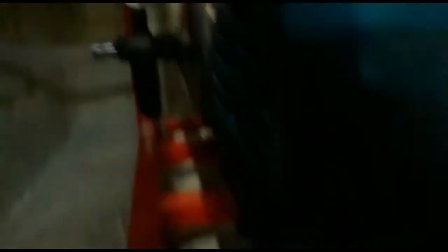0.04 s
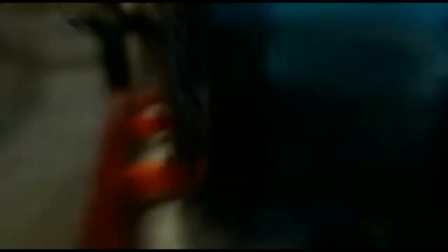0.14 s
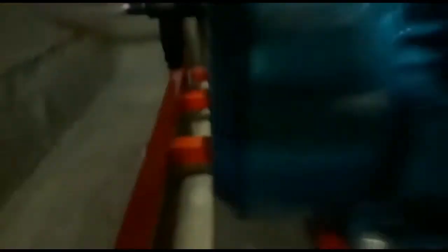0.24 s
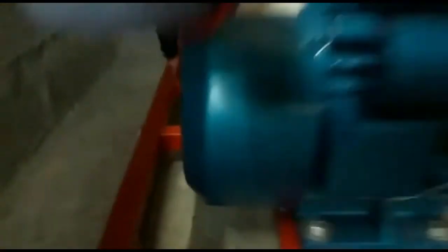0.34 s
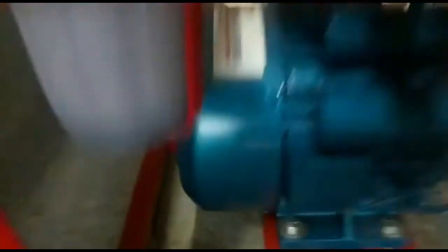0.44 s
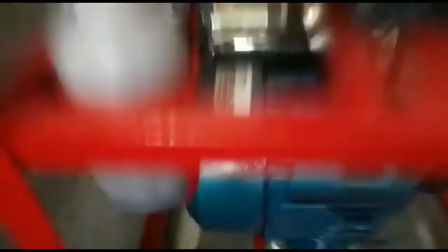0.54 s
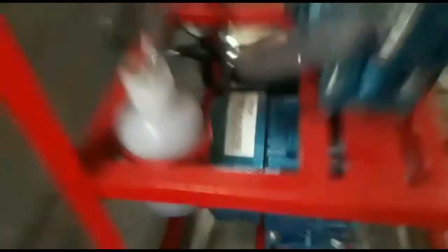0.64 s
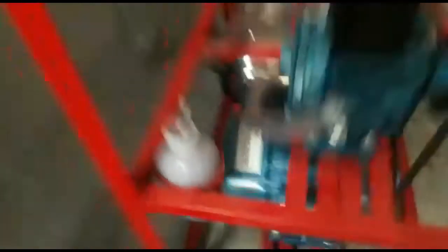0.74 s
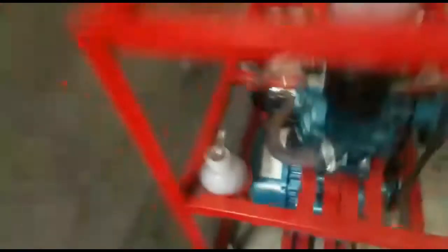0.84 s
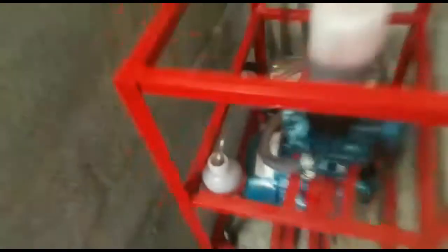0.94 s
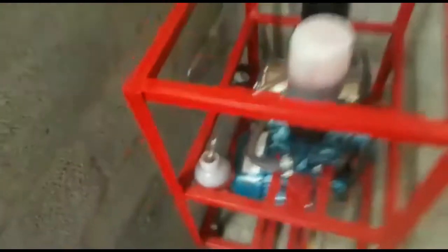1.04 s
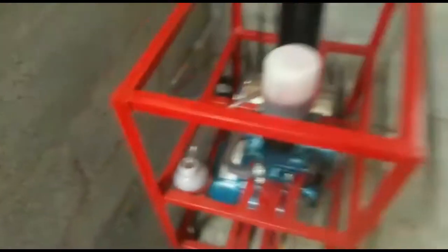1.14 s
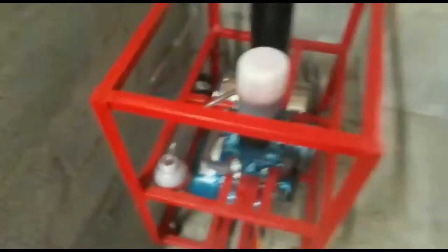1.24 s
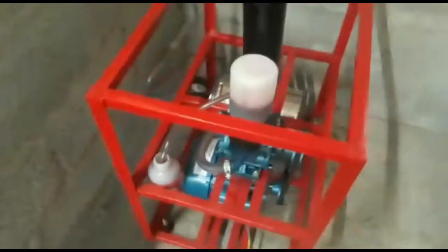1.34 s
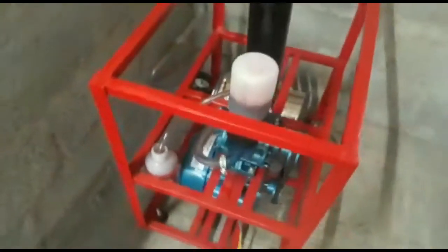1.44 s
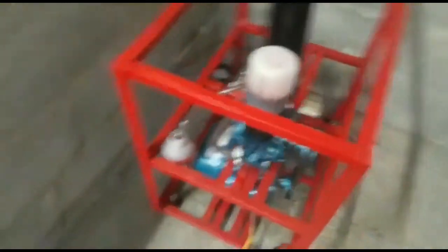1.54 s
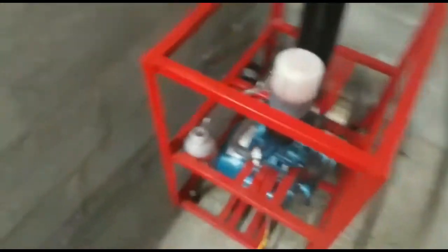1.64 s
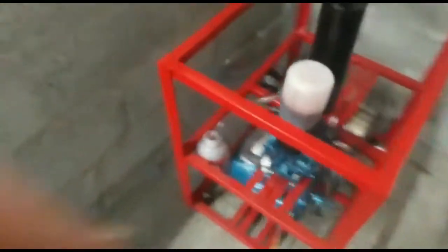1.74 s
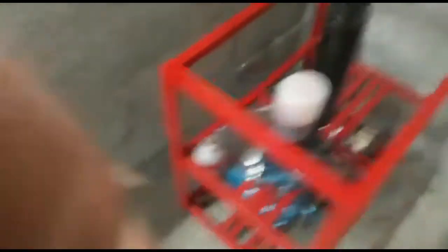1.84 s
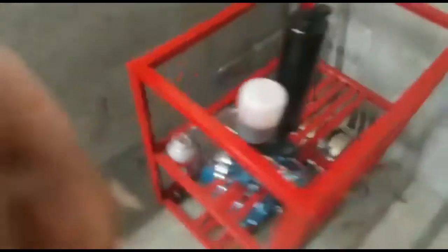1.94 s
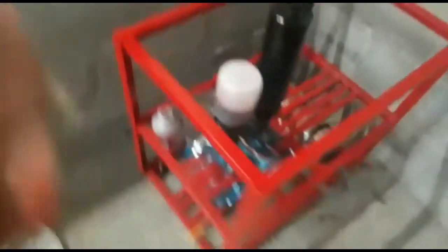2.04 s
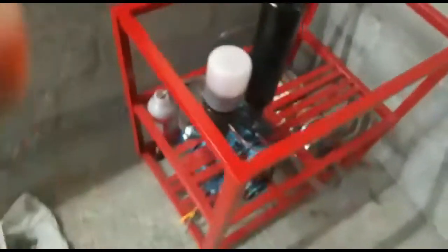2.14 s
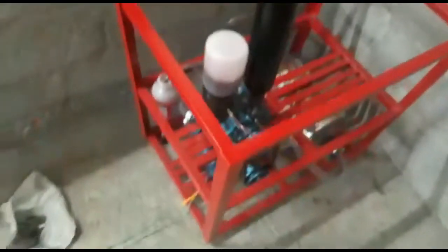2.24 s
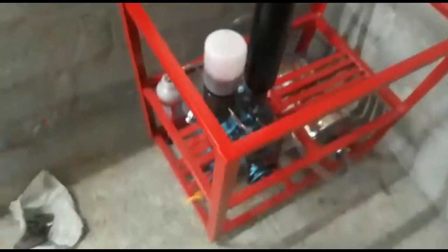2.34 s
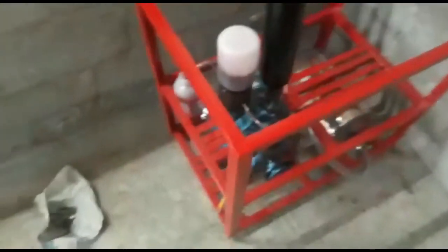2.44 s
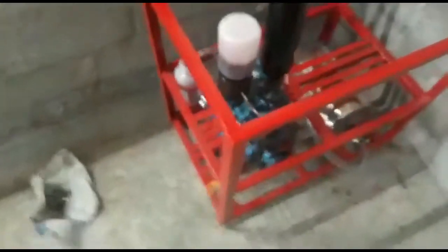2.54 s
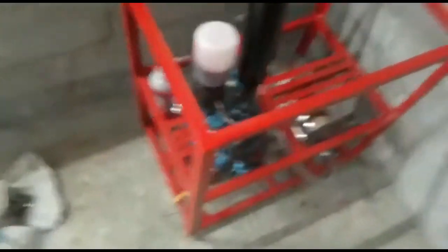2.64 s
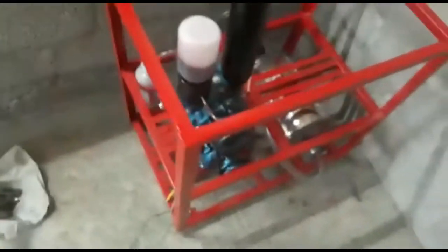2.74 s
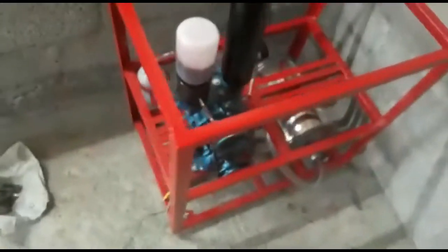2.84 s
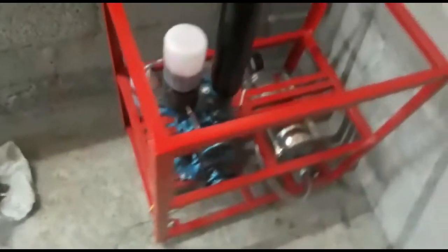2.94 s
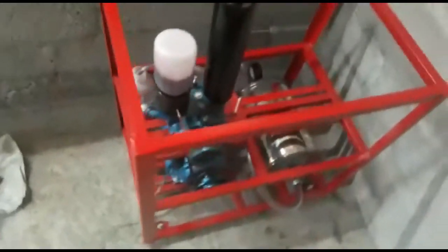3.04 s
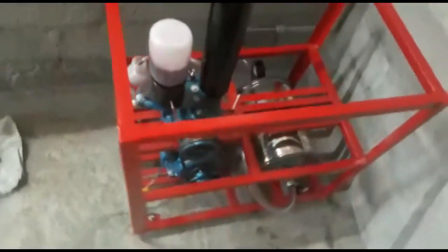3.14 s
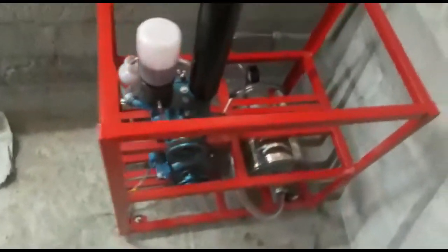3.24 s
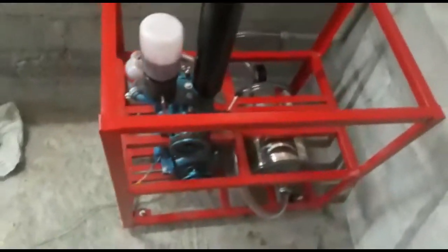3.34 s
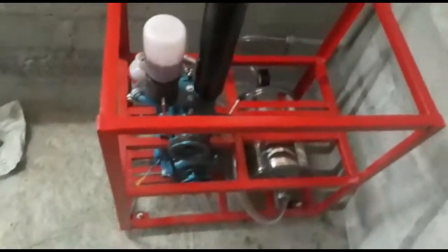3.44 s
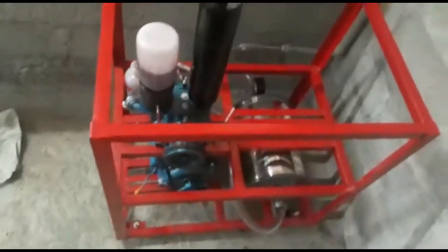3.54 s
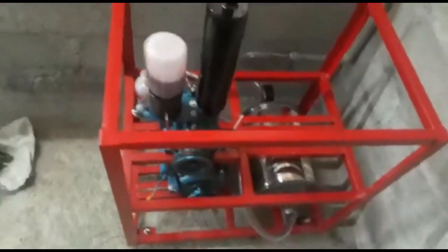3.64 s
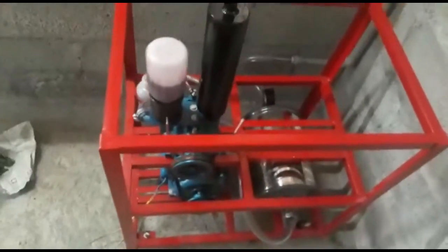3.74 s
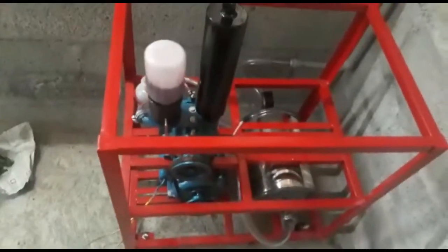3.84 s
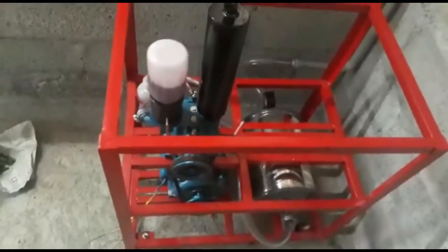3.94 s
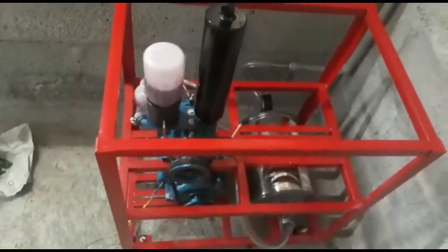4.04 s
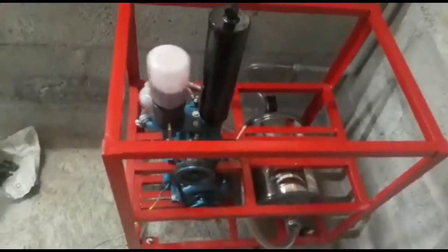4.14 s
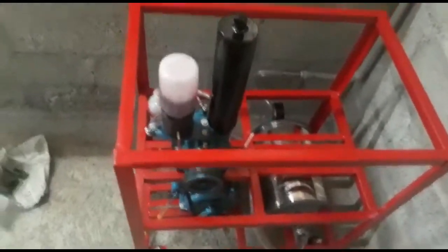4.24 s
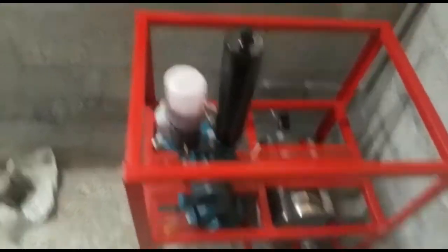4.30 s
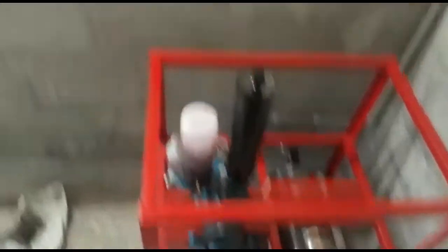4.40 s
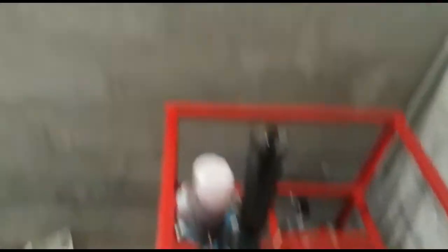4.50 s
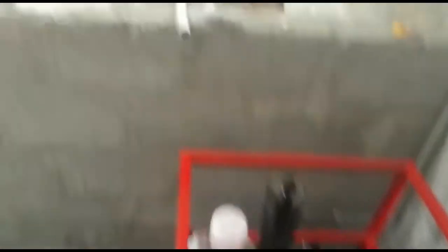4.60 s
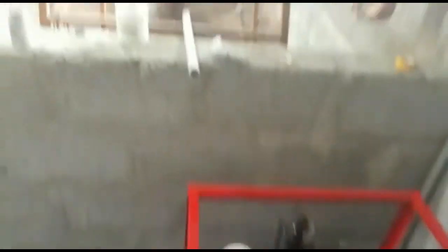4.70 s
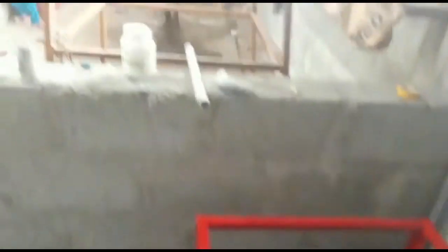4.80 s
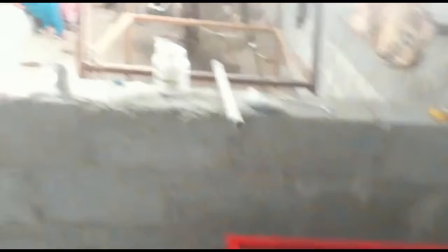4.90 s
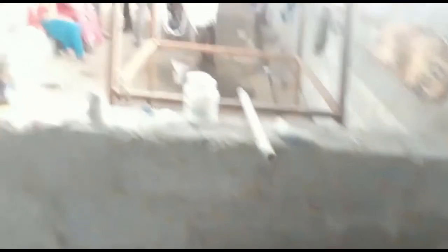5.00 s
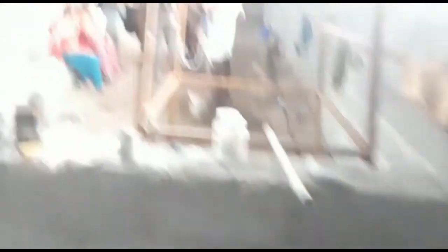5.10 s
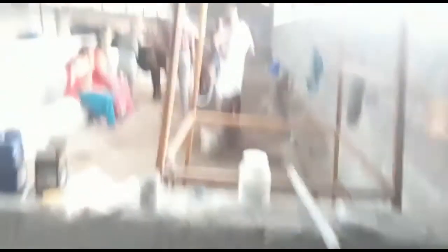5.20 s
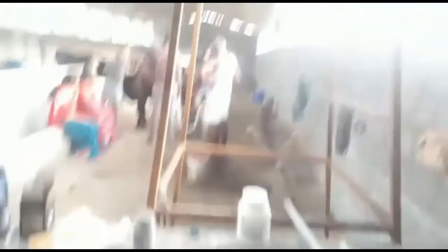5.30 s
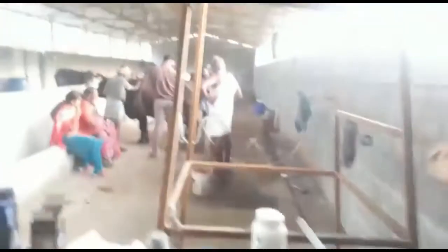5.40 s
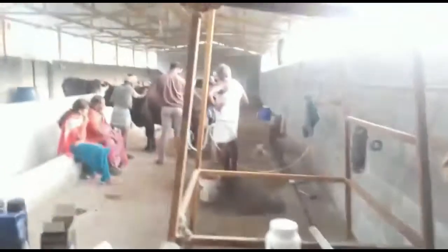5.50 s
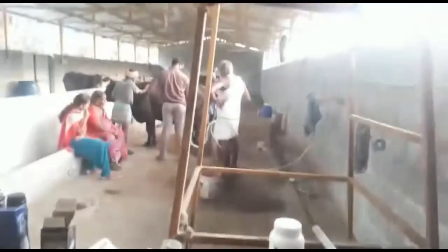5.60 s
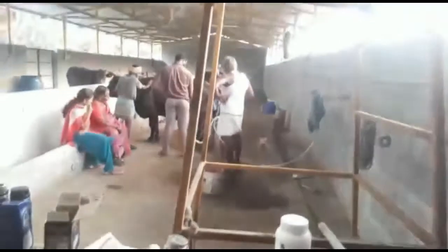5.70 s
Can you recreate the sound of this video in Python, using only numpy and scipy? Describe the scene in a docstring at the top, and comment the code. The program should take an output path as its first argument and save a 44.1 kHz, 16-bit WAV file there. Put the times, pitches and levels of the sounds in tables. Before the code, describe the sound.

A belt-driven vacuum pump runs without pause in a bare concrete shed. Its rough mid-range roar, fan rush and bright scraping sit over a light hum and thin whines. A strong hand bump and tiny metallic squeak come at the start, very close to the machine. The handheld phone then backs away and circles, so the noise softens and changes colour; a few faint bumps follow.

```python
"""A belt-driven four-vane vacuum pump drones in a steel frame in a bare shed while a phone is carried round it.
Its hum and whines are steady sine tones at multiples of the shaft and belt speeds, plus mains hum.
Casing roar, fan rush, vane scrape, leaking air and frame rumble are shaped noise; metal parts are narrow noise.
Most parts grow and fade with the place of the phone. Low thumps are the hand bumping it, and one short
metallic squeak is a brief sine."""
import sys
import numpy as np
from scipy import signal
from scipy.io import wavfile
from scipy.ndimage import uniform_filter1d

SR = 44100
rng = np.random.default_rng(int(sys.argv[2]) if len(sys.argv) > 2 else 0)


def store_pcm(level_fs):
    """Save levels as 16-bit WAV."""
    pcm = np.round(np.clip(level_fs, -1, 1) * 32767).astype(np.int16)
    wavfile.write(sys.argv[1], SR, np.atleast_2d(pcm).T)


N = 254016
T = np.arange(N) / SR  # time in seconds

SHAFT_HZ, MAINS_HUM_HZ = 23.854, 100.0
VANE_HZ = 4 * SHAFT_HZ  # four vanes pass in each shaft turn
BELT_HZ = SHAFT_HZ / 3  # the belt laps once in three shaft turns


def amp(db):
    """Turns decibels into a gain."""
    return 10 ** (np.asarray(db) / 20)


def evened(x):
    """Scales a signal to an average strength (rms) of 1."""
    return x / np.sqrt(np.mean(x ** 2) + 1e-20)


def wander(rate_hz):
    """Smooth random drift of rms 1: twenty sines from 0.4 Hz to rate_hz with random phases."""
    coarse_t = T[::128]
    turns = np.geomspace(.4, rate_hz, num=20)[:, None] * coarse_t + rng.random((20, 1))
    drift = evened(np.sin(2 * np.pi * turns).sum(axis=0))
    return np.interp(T, coarse_t, drift)


def tone(hz, start_s=0., turn=None):
    """A steady sine of rms 1; turn is its phase at start_s in whole turns, random if not given."""
    turn = rng.random() if turn is None else turn
    return np.sqrt(2) * np.cos(2 * np.pi * (hz * (T - start_s) + turn))


def noise(colour, patch_db, standing_peak_db):
    """Noise from random short-time spectra: quick patches, and narrow room peaks that shift slowly."""
    frames, hz = N // 256 + 5, np.fft.rfftfreq(1024, 1 / SR)
    real, imag, quick, slow = rng.standard_normal((frames, 513, 4)).T
    # axis 0 is pitch, axis 1 is time: quick patches are wide and short, room peaks narrow and long
    quick = evened(uniform_filter1d(uniform_filter1d(quick, size=10, axis=0), size=12, axis=1))
    slow = evened(uniform_filter1d(uniform_filter1d(slow, size=3, axis=0), size=90, axis=1))
    pitch_hz, level_db = np.transpose(colour)
    shape_db = np.interp(np.log(hz + 1), np.log(pitch_hz + 1), level_db, left=-90, right=-90)[:, None]
    spectra = (real + 1j * imag) * amp(shape_db + patch_db * quick + standing_peak_db * slow)
    return evened(signal.istft(spectra, nperseg=1024, noverlap=768)[1][:N])


def ring(hz, width_hz):
    """Noise narrowed twice by a resonance whose centre may move, so it whistles fuzzily."""
    r = np.exp(-np.pi * width_hz / SR)
    white = [1, 1j] @ rng.standard_normal((N, 2)).T
    slow = signal.lfilter([1], [1, -2 * r, r * r], white)
    turns = np.cumsum(hz * np.ones(N)) / SR
    return evened((slow * np.exp(2j * np.pi * turns)).real)  # moved up to its pitch


def chatter(stroke, turn):
    """A gain for rubbing, which swells with every vane stroke and every shaft turn."""
    return 1 + stroke * tone(VANE_HZ) + turn * tone(SHAFT_HZ)


def belt_bound(x, share, memory):
    """Part of a noise is the belt's own rattle: each lap repeats most of the lap before."""
    lap = round(SR / BELT_HZ)  # samples
    laps = np.resize(x[::-1], (N // lap + 6, lap))
    repeats = signal.lfilter([1], [1, -memory], laps, axis=0).ravel()[-N:]  # the first laps only build it up
    return np.sqrt(1 - share) * x + np.sqrt(share) * evened(repeats)


def standing_db(part):
    """The shed's standing waves lift or drop one part at places along the path."""
    # bell-shaped lifts and drops: part, centre_s, spread_s (standard deviation), change_db
    swells = [("hiss", 2.35, 0.27, 4), ("cowl", 2.25, 0.16, 1.6), ("cowl", 5.4, 0.49, 5.2),
              ("cylinder", .1, 0.23, -14), ("cylinder", 1.67, 0.42, 6.3), ("cylinder", 2.59, 0.076, -9),
              ("plate", 2.12, 0.047, 9.3), ("plate", 4.63, 0.17, 12), ("plate", 5.1, 0.19, 11),
              ("flange", 4.53, .12, 8), ("shroud", .12, .15, 6.1), ("mains", .2, 0.23, 2.2),
              ("exhaust", 5.1, 0.079, 5.7), ("order32", 1.3, 0.47, 4.4), ("order32", 2.93, 0.28, -6),
              ("order32", 4.84, 0.11, -14), ("order36", 0.92, 0.11, 10.5), ("order36", 4.93, 0.33, 7.6),
              ("order51", 1.0, 0.33, 11), ("order51", 3.8, 0.29, 8.3), ("order51", 5, 0.2, 7.4),
              ("whine", .1, 0.16, -16), ("whine", 2.18, 0.054, 12.4), ("whine", 3.155, 0.3, 10.4),
              ("whine", 0.62, 0.16, 4.2), ("whine", 1.24, .15, 4), ("whine", 1.95, 0.17, -9),
              ("whine", 2.48, 0.049, 6.1), ("whine", 4.15, 0.058, 4.8), ("whine", 5.8, 0.065, 8.1),
              ("order46", 2.17, .14, 19), ("order28", 5.17, 0.14, 8.3), ("order8", 0.68, 0.53, -4),
              ("order8", 3, 0.57, 2.7), ("order20", 4.9, 0.24, 4.3), ("order32", 0.725, 0.024, -15),
              ("cylinder", 0.72, 0.11, 5.5), ("cylinder", 0.97, 0.06, -5), ("cylinder", 2.14, 0.13, -4),
              ("fan", 4.64, 0.14, 2.4), ("fan", 2.11, 0.086, 1.6), ("rumble", 0.29, 0.25, -1.7),
              ("cowl", 0.33, 0.1, 5.7), ("fan", 1.41, 0.25, 2.8), ("fan", .9, 0.038, -5),
              ("fan", 5.4, 0.26, -1.5), ("whine", 3.7, .17, 3.6), ("cowl", 2.75, .15, -1),
              ("exhaust", 0.57, 0.11, -4.5), ("drum", 0.62, 0.11, 2.4), ("order24", 0.38, 0.16, 9.2),
              ("cylinder", 2.73, 0.035, 6), ("cylinder", 4.93, 0.061, 4.8), ("cylinder", 5.1, .06, -4),
              ("cylinder", 1.17, 0.075, 3.4), ("scrape", 4.58, 0.14, 1.3)]
    return sum(db * np.exp(-.5 * ((T - s) / spread) ** 2) for name, s, spread, db in swells if name == part)


def heard(part):
    """Gain of one part at the phone: distance, facing, standing waves and some chance."""
    # path of the phone: time_s, distance_m, facing the pump (0 = away, 1 = towards)
    path = [(0.1, 0.33, 0.74), (.5, 0.35, 0.5), (.8, 0.4, 0.11), (1.2, 0.59, 0.1), (1.5, 0.94, 0.27),
            (2.0, 0.78, 0), (2.3, 0.89, 0.7), (2.8, 0.96, 0.94), (3.3, 0.94, 1.0), (4.3, 0.86, 0.89),
            (4.6, 1.14, 0.87), (5.05, 1.35, 0.53), (5.35, 1.12, 0.07), (5.76, 1, 0)]
    # each part: level_db at 1 m facing away, share of the distance change followed (1 = all of it),
    # faced_db gained when faced, waver_db of random wavering (rms)
    part_levels = {"roar": (-27, 0.8069, -0.5, 0), "fan": (-30.5, .5, 4, 0), "scrape": (-31, .5, 6.5, 0),
                   "hiss": (-48.5, 0.23, 6.5, .5), "rumble": (-38.5, 0.36, 0.5, 0),
                   "vents": (-47, 1.79, 10, 0.5), "slots": (-51, 2.01, 1.5, -0.5),
                   "exhaust": (-43, 0.58, -5, 1.5), "cowl": (-41, 1.25, -2.5, 2),
                   "drum": (-35.5, 0.74, 1, 0.5), "cylinder": (-35.5, 0.56, 9, 1.0),
                   "plate": (-42.5, 0.78, 5.5, 1), "flange": (-47, 0.88, 4, 4.5),
                   "shroud": (-52, 1.85, 2, -1), "mains": (-49.5, 0.32, 3.5, 1.3),
                   "order32": (-40, .5, 2.5, 1.5), "order36": (-53.5, 0.97, 13, 0.5),
                   "order51": (-48, -0.07, 0, 3), "whine": (-43.5, 1.2, 4.5, 1.8)}
    time_s, metres, facing = np.transpose(path)
    db, follows, faced_db, waver_db = part_levels[part]
    near_db = -20 * np.log10(np.interp(T, time_s, np.maximum(metres, .05)))
    place_db = follows * near_db + faced_db * np.interp(T, time_s, facing)
    return amp(db + place_db + waver_db * wander(5.) + standing_db(part))


def casing_roar():
    """The casing roars: belt-bound noise that swells with the strokes and flutters roughly."""
    # colour of the noise: pitch_hz, relative level_db
    roar_colour = [(960, -44), (1080, -5), (1200, -9), (1400, 2.5), (1520, -5), (1740, 2.5), (1850, -2),
                   (1970, -2), (2100, -1.5), (2500, -0.5), (2900, -8.5)]
    roar = heard("roar") * belt_bound(noise(roar_colour, 1.1, 2.8), .4, .75)
    return roar * chatter(.08, .06) * amp(.9 * wander(90.))


def fan_scrape_and_hiss():
    """Rush of the cooling fan, scrape of the vanes and hiss of leaking air are noises that flutter together."""
    # colours of the three noises: pitch_hz, relative level_db
    fan_colour = [(2400, -19), (2700, -1.5), (3300, 2), (3600, -1), (3880, 3.5), (4000, -0.5), (4150, 2),
                  (4400, -19), (4700, -28)]
    scrape_colour = [(4150, -18), (4450, -2), (5050, 4.5), (5400, 3.5), (5600, -1), (7200, -3.5),
                     (8000, 0.5), (8800, -1), (9600, -10.5), (10500, -22.5), (11000, -38)]
    hiss_colour = [(9800, -10), (10500, -2), (10900, 0.5), (11400, -1), (12100, -1), (13300, -1.5),
                   (14300, 1.5), (16000, -1.5)]
    treble = heard("fan") * belt_bound(noise(fan_colour, .7, 2.0), .24, .75)
    treble += heard("scrape") * noise(scrape_colour, 0.44, 2.8)
    treble += heard("hiss") * noise(hiss_colour, 0.59, 0.81)
    return treble * chatter(0.056, 0.062) * amp(.5 * wander(30.))


def motor_vents():
    """Wind from the motor vents, heard close up, is one broad band of noise."""
    return heard("vents") * ring(4700., 1700.0)


def frame_rumble():
    """The steel frame rumbles as low noise."""
    # colour of the noise: pitch_hz, relative level_db
    rumble_colour = [(15, -13), (55, -25), (80, -15.5), (120, -12), (200, -3), (275, -14.5), (340, -5),
                     (520, -5), (880, -2.5), (1010, -2), (1100, -31)]
    return heard("rumble") * noise(rumble_colour, .8, 1.0)


def metal_rings():
    """The scraping excites each metal part: narrow noise at its own pitch, which throbs."""
    # ringing parts by name: pitch_hz, width_hz
    metal_parts = {"exhaust": (272, 41), "cowl": (1112, 50), "drum": (2365, 97), "cylinder": (4850, 150),
                   "plate": (7730, 220), "flange": (5150, 260), "shroud": (1965, 50)}
    # two rings seem to slide in pitch as the phone moves, by name: time_s, factor on the pitch
    pitch_slides = {"cylinder": [(.55, 1.02), (.8, .982), (1.12, .993), (1.3, 1.01), (1.45, 1.01),
                    (1.6, .993), (2.1, 1.014), (2.55, .992), (4.2, .998), (4.55, 1.012), (4.75, .992),
                    (4.97, 1.045), (5.06, 1.04), (5.15, 1.0)], "plate": [(2.05, .995), (2.15, 1.022),
                    (2.22, .997), (4.4, 1.012), (4.65, 1.0)]}
    out = np.zeros(N)
    for part, (hz, width_hz) in metal_parts.items():
        bend = np.interp(T, *np.transpose(pitch_slides[part])) if part in pitch_slides else 1
        drift = 1 + .002 * wander(8.)
        throb = chatter(0.025, 0.081) * amp(1.1 * wander(25.))
        out += heard(part) * ring(hz * bend * drift, width_hz) * throb
    return out


def mains_and_vane_hum():
    """Mains hum beats against the vane tone, one pulse per vane, while both flicker together."""
    cancel_s = 3.10  # a moment when the two are almost in opposite phase
    level = heard("mains") * amp(1.8 * wander(20.))
    mains = tone(MAINS_HUM_HZ, cancel_s, 0.54)
    vanes = amp(-7.5) * tone(VANE_HZ, cancel_s, 0.)
    return level * (mains + vanes)


def slot_whines():
    """The rotor slots of the motor whine, heard close to it, as sines that waver apart."""
    # whines: pitch_hz, level_db relative to the strongest
    slots = [(1647, -6), (1899, 0), (4447, -14), (5415, -10)]
    return heard("slots") * sum(amp(db + 2.5 * wander(6.)) * tone(hz) for hz, db in slots)


def shaft_tones():
    """Sines at whole multiples (orders) of the shaft speed; every fourth order belongs to the vane strokes."""
    # tones with no distance change: order, level_db
    order_levels = [(8, -46), (12, -50.5), (16, -48), (20, -49.5), (24, -51.5), (25, -58), (28, -50.5),
                    (29, -60), (33, -48.5), (46, -60), (56, -68)]
    # neighbours of order 32: offset in multiples of the belt lap rate, level_db relative to order 32
    vane_sides = [(-1, -22), (0.96, -12.5)]
    out = np.zeros(N)
    for order, db in order_levels:
        out += amp(db + 1.0 * wander(2.5) + standing_db("order" + str(order))) * tone(order * SHAFT_HZ)
    sides = sum(amp(db) * tone(32 * SHAFT_HZ + k * BELT_HZ) for k, db in vane_sides)
    out += heard("order32") * (tone(32 * SHAFT_HZ) + sides)
    out += heard("order51") * tone(51 * SHAFT_HZ)
    panel = ring(872., 98.0)  # order 36 shakes a loose panel, which blurs it
    out += heard("order36") * (amp(-2 + 2 * wander(8.)) * tone(36 * SHAFT_HZ) + amp(-1) * panel)
    return out


def belt_whine():
    """The belt whines at 166 times its lap rate, dipping once per lap, with wavering neighbour tones."""
    # neighbours of the whine: offset in multiples of the belt lap rate, level_db
    whine_sides = [(-2.5, -48), (-1, -46), (1.2, -52)]
    dip_s = 3.16  # a moment when the whine dips and its neighbours oppose it
    throb = 1 - .18 * tone(BELT_HZ, dip_s, 0.)
    out = heard("whine") * throb * tone(166 * BELT_HZ, dip_s, 0.)
    for k, db in whine_sides:
        out += amp(db + 3.0 * wander(4.)) * tone((166 + k) * BELT_HZ, dip_s, .5)
    return out


def hand_bumps():
    """The hand bumps the phone: a sharp push on the membrane between a small and a large swing back."""
    # bumps: time_s, level_db of the push before the knock and the low cut, pitch_hz
    bump_list = [(.1331, -7.5, 265), (.905, -28, 240), (1.783, -38, 80), (3.052, -31, 110),
                 (3.254, -30, 70), (3.332, -33, 120)]
    half_cycles, lag_cycles = 0.63, 0.15  # half length, and how far the weight lies after the push
    out = np.zeros(N)
    for s, db, hz in bump_list:
        turns = (T - s) * hz
        knock = 0.43 * np.cos(2 * np.pi * 2.6 * turns) * np.exp(-(turns / 0.83) ** 2)  # of the casing
        push = np.cos(2 * np.pi * turns) + knock
        out += amp(db) * push * np.exp(-((turns - lag_cycles) / half_cycles) ** 2)
    # the casing vents the slow push
    return signal.sosfilt(signal.butter(2, 45, "high", fs=SR, output="sos"), out)


def squeak():
    """A short metallic squeak: a sine inside a brief bell-shaped swell."""
    # the squeak: time_s, level_db, pitch_hz, length_s (from the peak down to 37 %)
    squeak_values = (.39, -12, 3650, .0035)
    s, db, hz, length_s = squeak_values
    return amp(db) * np.sin(2 * np.pi * hz * T) * np.exp(-((T - s) / length_s) ** 2)


def scene():
    """All parts add up at one microphone, so both channels are the same."""
    noises = casing_roar() + fan_scrape_and_hiss() + motor_vents() + frame_rumble()
    tones = mains_and_vane_hum() + slot_whines() + shaft_tones() + belt_whine()
    return np.tile(noises + metal_rings() + tones + hand_bumps() + squeak(), (2, 1))


def record(dry):
    """The small microphone thins the deep bass; then a steep filter removes the highest treble."""
    mic_low_hz, edge_hz = 76, 15720
    thin = signal.sosfilt(signal.butter(1, mic_low_hz, "high", fs=SR, output="sos"), dry)
    band_limit = signal.firwin(2047, edge_hz, window=("kaiser", 10), fs=SR)
    return signal.oaconvolve(thin, band_limit[None], "same")


dry = scene()
out = record(dry)
store_pcm(out)
```